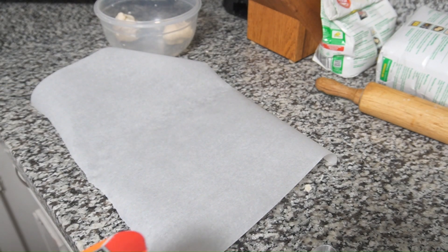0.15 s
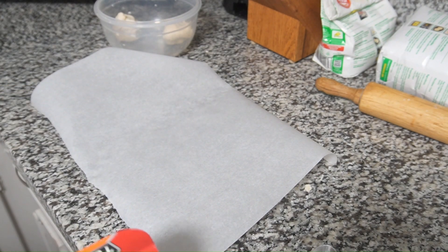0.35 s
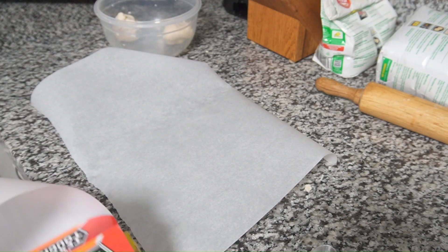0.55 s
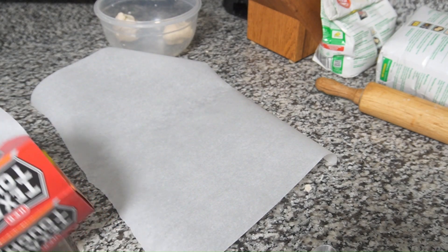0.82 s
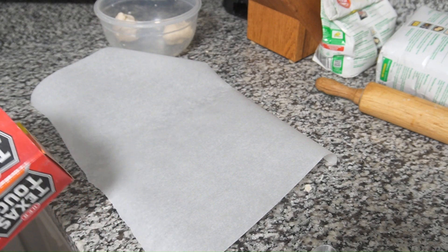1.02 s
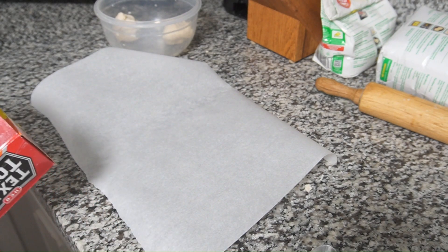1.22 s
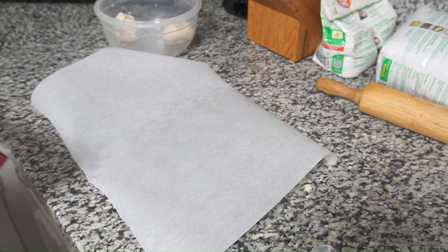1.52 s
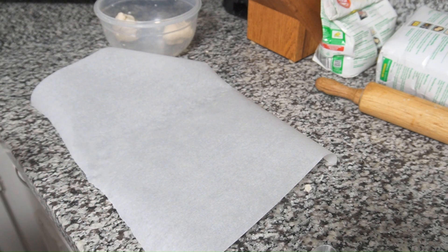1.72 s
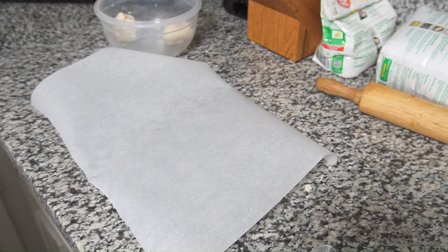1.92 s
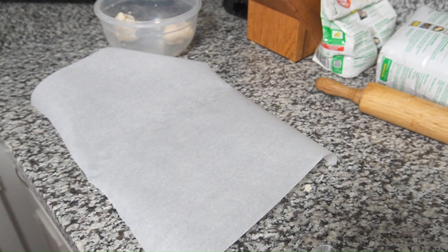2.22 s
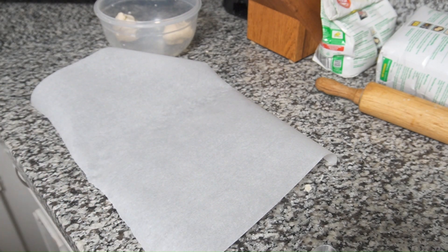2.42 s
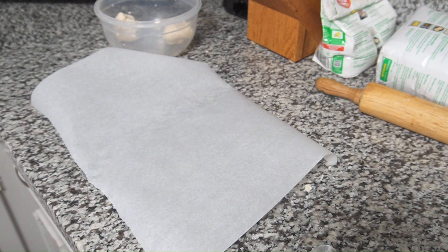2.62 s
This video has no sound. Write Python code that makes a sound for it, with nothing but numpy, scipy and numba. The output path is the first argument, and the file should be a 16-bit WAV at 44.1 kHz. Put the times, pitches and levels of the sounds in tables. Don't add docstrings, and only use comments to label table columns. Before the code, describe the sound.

Parchment paper rustles close up on a stone counter: light strokes, a long hissing drag, brisk rubbing, a second drag, then a soft box bump and last crinkles over faint kitchen hum, in stereo.

```python
import sys
import numpy as np
from scipy import signal
from scipy.fft import rfft, irfft
from scipy.io import wavfile
from scipy.ndimage import uniform_filter1d
from numba import njit

SR = 44100
rng = np.random.default_rng(int(sys.argv[2]) if len(sys.argv) > 2 else 0)


def volts(x):
    e = np.asarray(x, float) / 20
    return 10 ** e


def master(y):
    cut = np.clip(np.atleast_2d(y).T, -1, 1)
    pcm = np.round(cut * 32767)
    wavfile.write(sys.argv[1], SR, pcm.astype(np.int16))


N = 121275


@njit
def resonator(x, hz, width):
    y, b, l = np.empty(len(x)), 0., 0.
    g, k = np.tan(np.pi * hz / SR), width / hz
    for i in range(len(x)):
        v = (b + g * (x[i] - l)) / (1 + g * (g + k))
        b, l, y[i] = 2 * v - b, l + 2 * g * v, k * v
    return y


def unit(x):
    return x / np.sqrt(np.mean(x ** 2))


def band(x, hz, width):
    hz, width = float(hz), float(width)
    return unit(resonator(resonator(x, hz, width), hz, width))


def noise_band(hz, width):
    return band(rng.standard_normal(N), hz, width)


def at(table, hz):
    points = np.array(table)
    return np.interp(np.log(hz), np.log(points[:, 0]), points[:, 1])


def over_time(table, t):
    return np.interp(t, *np.array(table).T)


def walk(rate):
    k = int(SR / rate)
    steps = np.repeat(rng.standard_normal(N // k + 1), k)
    return unit(uniform_filter1d(uniform_filter1d(steps, k), k)[:N])


# frequency in Hz, side level in dB.
SIDE_LEVELS = [(60, -30), (130, -29), (220, -24), (380, -27.5), (700, -17.5), (1290, -15.5), (2380, -10),
               (4400, -8), (8120, -5), (15000, -1)]


def stereo(mid, side, hz):
    return mid + volts(at(SIDE_LEVELS, hz)) * side * np.array([[1], [-1]])


# frequency in Hz, level in dB per Hz.
KITCHEN_NOISE = [(30, -17), (90, -7.5), (150, -2.5), (250, -4), (450, -4), (700, -14), (2500, -10),
                 (16000, -40.5)]
# frequency in Hz, level in dB.
MAINS_HUM = [(59.5, -63), (119, -68)]


def kitchen(t):
    noise = 0
    for hz in 35 * 2 ** np.arange(0, 8.9, .5):
        mid, side = noise_band(hz, hz * 0.47), noise_band(hz, hz * 0.47)
        gain = volts(at(KITCHEN_NOISE, hz) + 1.8 * walk(6.3)) * np.sqrt(hz)
        noise = noise + gain * stereo(mid, 2.6 * side, hz)
    hum = 0
    for hz, db in MAINS_HUM:
        phase = 2 * np.pi * hz * t + 0.17 * walk(2.2)
        hum = hum + volts(db + 3 + 0.55 * walk(6.7)) * np.sin(phase)
    return unit(noise) * volts(-49) + hum


# loudest moment in seconds, level in dB, rise in seconds per 20 dB,
# fall in seconds per 20 dB, tilt in dB per octave.
HAND_STROKES = [(0.008, -34, 2, -0.02, -1), (.03, -43, 2, 0.1, 0), (0.077, -37, -0.1, 0.07, 0.5),
                (0.1, -33, 0.03, -0.02, 0.5), (.12, -44.5, 0.5, .6, -1.5), (0.208, -33, -0.1, 0.2, -0.5),
                (.232, -31, 0, 0, -0.5), (.262, -33, 0.03, 0.2, -0.5), (.283, -35, -0.02, 0.2, 0),
                (.305, -32.5, -0.06, 1.05, -2.5), (.735, -27.5, 0.07, 0.05, -1),
                (0.767, -22.5, .08, 0.03, 1.5), (0.789, -26, .03, 0.05, 1.5), (0.865, -24, 0.1, 0.08, -1),
                (.885, -27.5, 0.11, -0.03, -1), (.905, -21.5, 0.04, 0.05, 0),
                (.928, -25.5, 0.1, -0.03, -1.5), (.975, -24, 0.13, 0.04, -1), (1.005, -24.5, 0.07, 0.03, 0),
                (1.033, -23, 0.1, 0.04, 0.5), (1.058, -29, 0.16, -0.04, -0.5),
                (1.086, -32, 0.26, .06, -0.5), (1.155, -27, 0.04, 0.07, -.5), (1.186, -25, 0.08, 0.08, 0),
                (1.211, -32.5, 0, 0.08, -2), (1.25, -39.5, -0.6, 0.6, -1), (1.319, -32.5, -0.1, 0.3, -0.5),
                (1.345, -26.5, -0.02, 0.1, 0.5), (1.368, -25, 0.03, 0.08, 1),
                (1.424, -28.5, 0.02, 0.11, -1.5), (1.46, -28.5, 0.08, 0.07, -1), (1.51, -37, 0, 0.14, 0.5),
                (1.588, -33.5, 0, 0.17, 0), (2.245, -31, 0.1, 0.13, 0), (2.294, -22, 0.04, 0.1148, 0.5),
                (2.35, -30, 0.14, 0.1, -0.5), (2.415, -27.5, 0.07, 0.12, 0.5), (2.49, -38.5, 0.2, 0.17, 0),
                (2.595, -43.5, 0, 0, -.5), (2.74, -49, -0.4, .3, 0)]
# time in seconds, level in dB, tilt in dB per octave, box drone in dB.
LONG_SLIDES = [
    [(0.3, -51, -8, -24), (0.326, -26.5, 2.0, -18), (0.338, -30.5, 2.0, -13.5), (0.406, -24, 1.5, -13.5),
     (0.428, -24.5, 2, -17), (0.652, -23.5, 1, -23.5), (0.705, -30.5, -1.5, -25)],
    [(1.62, -43, -0.5, -26), (1.666, -27.5, -1, -17), (1.714, -22, 1, -25), (1.998, -23.5, 2.0, -24),
     (2.08, -22, 0.5, -22.5), (2.15, -26, 0, -27), (2.2, -32, 0, -35), (2.24, -44, -3, -5)],
]


def motion(t, octaves):
    lean = octaves * (2.38 if octaves > 0 else .6)
    power = 0
    for s, db, rise, fall, tilt in HAND_STROKES:
        slopes = np.where(t < s, (s - t) / max(rise, .005), (t - s) / max(fall, .005))
        power = power + volts(db + tilt * lean - 20 * slopes) ** 2
    for slide in LONG_SLIDES:
        s, db, tilt, _ = np.array(slide).T
        power = power + volts(np.interp(t, s, db + tilt * lean, -120, -120)) ** 2
    soft_s = .009
    return uniform_filter1d(power, size=int(soft_s * 1000) + 1)


def crackle():
    return unit((rng.random(N) < 260 / SR) * rng.standard_normal(N))


def grit():
    hit_db = 3 * np.minimum(rng.exponential(size=N), 2.8)
    hits = (rng.random(N) < 2200 / SR) * volts(hit_db)
    return unit(1 + volts(-9) * unit(signal.lfilter([1], [1, -np.exp(-1 / (.0003 * SR))], hits)))


def slice_of(spectrum, hz, octaves):
    bins_hz = np.arange(1, len(spectrum) + 1) * SR / 2 / len(spectrum)
    off = np.log2(bins_hz / hz) / octaves
    return irfft(spectrum * np.cos(np.pi / 2 * np.clip(off, -1, 1)), 2 * len(spectrum) - 2)[:N]


# frequency in Hz, level in dB per Hz.
PAPER_TONE = [(200, -19.5), (500, -11.5), (800, -10.5), (1150, -1.5), (2200, 1), (4800, -1.5),
              (9000, -10.5), (16000, -19)]
# time in seconds, boost in dB.
CURL_HOLLOW = [(0, 0.3), (.42, 3.5), (.5, 1), (.9, -3), (1.1, 4), (1.5, 5), (1.75, -0.9), (1.95, 3.2),
               (2.04, -3.5), (2.1, 0), (2.4, -4), (2.7, 3.5)]


def rubbing(t):
    def rub_spectrum(grains):
        hiss = grains * rng.standard_normal(N)
        return rfft(unit(hiss + volts(-6) * crackle()), 2 ** 17)

    grains = [grit() for _ in range(8)]
    noise = [[rub_spectrum(g) for g in grains[k:k + 2]] for k in range(0, 8, 2)]
    out, slow, swell = 0, t[::44], walk(24.76)
    hollow_db, step = over_time(CURL_HOLLOW, t), 1 / 7
    for k, hz in enumerate(200 * 2 ** np.arange(0, 6.4, step)):
        octaves = max(np.log2(hz / 3190), -1.5)
        power = np.interp(t, slow, motion(slow, octaves))
        hollow = hollow_db * np.exp(-(np.log2(hz / 1350) / .45) ** 2)
        patch = min(.75, 5000 / hz) * walk(18)
        gain = np.sqrt(power) * volts(at(PAPER_TONE, hz) + 5.5 + hollow + .3 * swell + patch)
        mid, side = (slice_of(x, hz, step) for x in noise[k % 4])
        out = out + gain * stereo(mid, side, hz)
    return out


def counter(x):
    hop, out = int(.15 * SR), 1. * x
    for i in range(-hop, N, hop):
        start = max(i, 0)
        decay = volts(-60 * np.arange(6000) / SR / .13)
        echo = resonator(rng.standard_normal(6000), 2140.0, 12000.0) * decay
        echo = echo / np.sqrt(np.sum(echo ** 2))
        fade = np.cos(np.pi / 2 * np.clip((np.arange(N) - i - hop) / hop, -1, 1)) ** 2
        part = (x * fade)[:, start:i + 2 * hop]
        wet = signal.fftconvolve(part, echo[None], axes=1)[:, :N - start]
        out[:, start:start + wet.shape[1]] += volts(-9) * wet
    return out


# start in seconds, peak in dB, pitch in Hz,
# time to fade by 60 dB in seconds, spray in dB.
CREASES = [(.006, -23, 3200, 0.025, -18.5), (0.0734, -28.5, 3160, 0.048, -12),
           (0.185, -26, 2860, 0.035, -22), (.2059, -26, 2500, 0.033, -13),
           (0.2233, -15.5, 3140, 0.033, -15), (0.2284, -16.5, 2550, 0.051, -11.5),
           (0.2588, -23, 2400, 0.034, -22), (0.3164, -16, 2180, 0.038, -25),
           (0.3256, -19, 1600, 0.047, -0.5), (0.42, -12, 1300, 0.058, -12), (0.7244, -23.5, 1760, 0.1, -23),
           (.765, -15.5, 4500, 0.044, -2), (0.7873, -20.5, 4680, 0.046, 1), (0.8587, -21, 5220, 0.052, -10),
           (0.9015, -12.5, 4560, 0.12, -14), (0.999, -17, 3000, 0.046, -13), (1.1078, -22, 2600, 0.029, -1),
           (1.1500, -31, 1570, 0.067, -8), (1.3145, -33, 1600, 0.06, -14), (1.3342, -23, 3530, 0.083, -13),
           (1.426, -19.5, 1620, 0.031, -13), (1.477, -17.5, 3940, 0.067, -1),
           (1.568, -25.5, 1890, 0.1, -10.5), (1.643, -25, 1520, 0.07, -8), (1.6818, -21, 3340, 0.053, -7),
           (1.701, -15.5, 1580, 0.095, -17), (1.752, -15, 2220, .05, -1), (2.012, -12, 2200, 0.037, -10),
           (2.09, -16, 1390, 0.044, -13), (2.2397, -20.5, 3470, 0.067, -6.5), (2.2882, -16, 4900, .05, -6),
           (2.3180, -15.5, 4470, 0.063, -3.5), (2.401, -17, 4470, 0.066, -15),
           (2.48, -27, 4690, 0.052, -11), (2.5504, -28, 5120, 0.035, -13)]


def snaps(t):
    spray = stereo(noise_band(9300, 12000), noise_band(9300, 12000), 6000)
    out, n = np.zeros((2, N)), 6000
    click = volts(17) * (t[:n] == 0)
    for s, db, hz, t60, spray_db in CREASES:
        i = int(s * SR)
        mid, side = (band(x, hz, hz * 0.91) for x in rng.standard_normal((2, n)) + click)
        ring = volts(-2) * stereo(mid, side, hz)
        decay = volts(-60 * t[:n] / max(t60, .005))
        out[:, i:i + n] += volts(db - 8) * decay * (ring + volts(spray_db) * spray[:, i:i + n])
    return out


def swells(t, rows):
    out = 0
    for s, db, hz, length in rows:
        shape = np.exp(-((t - s) / max(length, .01) * 2) ** 2)
        out = out + volts(db) * shape * noise_band(hz, min(hz / 4, 240))
    return out


# loudest moment in seconds, level in dB, pitch in Hz, length in seconds.
EDGE_SQUEAKS = [(.01, -38, 3350, 0.025), (0.265, -36.5, 2390, 0.048), (0.454, -31, 3700, .03),
                (0.64, -35, 2620, 0.026), (1.376, -34.5, 1310, 0.082), (1.457, -35, 1440, 0.03),
                (1.753, -28, 3900, 0.023), (1.791, -28.5, 2880, 0.057), (1.83, -35, 2550, 0.017),
                (2.056, -33, 4130, 0.048)]


def squeaks(t):
    return swells(t, EDGE_SQUEAKS)


# loudest moment in seconds, level in dB, pitch in Hz, length in seconds.
WALL_THRUMS = [(0.273, -53, 284, 0.077), (0.387, -43.5, 305, 0.092), (0.537, -47, 283, .08),
               (0.763, -48.5, 350, 0.076), (0.968, -50, 330, .05), (1.593, -54, 490, 0.056),
               (1.74, -41, 338, .04), (1.867, -42.5, 450, 0.055), (2.077, -42, 307, 0.093),
               (2.292, -44, 850, .03), (2.403, -51, 385, 0.11)]


def thrums(t):
    return swells(t, WALL_THRUMS)


# frequency in Hz, width in Hz, level in dB.
BOX_DRONE = [(340, 176, 3), (515, 250, 2.5), (196, 630, -5)]


def drone(t):
    levels = []
    for slide in LONG_SLIDES:
        s, db, _, drone_db = np.array(slide).T
        levels.append(np.interp(t, s, db + drone_db, -120, -120))
    body = unit(sum(volts(db + 0.3 * walk(11.0)) * noise_band(hz, width) for hz, width, db in BOX_DRONE))
    loudness = uniform_filter1d(volts(np.max(levels, axis=0)), size=400)
    return stereo(body, noise_band(660, 400), 440) * loudness


# start in seconds, level in dB.
BOX_KNOCKS = [
    (2.287, -25.5),
]
# frequency in Hz, level in dB, time to fade by 60 dB in seconds.
BOX_TONES = [(503, 0, .1), (310, -10, .09), (836, -3, .06), (1910, -5, .05), (2870, -8, .05),
             (640, -9, .04)]


def knock(t):
    out = 0
    for s, db in BOX_KNOCKS:
        since = t - s
        attack = np.clip(since / 0.0035, 0, 1)
        for hz, tone_db, t60 in BOX_TONES:
            decay = volts(db + tone_db - 60 * np.clip(since, 0, 9) / t60)
            out = out + decay * attack * np.sin(2 * np.pi * hz * since)
    return out


def room_tail(sharp, t):
    tail = rng.standard_normal((2, 15000)) * volts(-60 * t[:15000] / .25)
    tail = tail / np.sqrt(np.sum(tail ** 2) / 2)
    return volts(-9) * signal.fftconvolve(sharp, tail, axes=1)[:, :N]


def ducking(paper):
    loud_db = 10 * np.log10(uniform_filter1d(paper[0] ** 2, size=int(.2 * SR)) + 1e-9)
    return volts(-.45 * np.clip(loud_db + 29, 0, 30))


# time in seconds, left over right in dB.
PAPER_LEFT = [(0, -0.7), (.4, 0.8), (.9, 1.2), (1.5, 1), (2.0, .8), (2.7, 0.2)]


def scene():
    t = np.arange(N) / SR
    sharp = snaps(t) + knock(t)
    paper = counter(rubbing(t)) + squeaks(t) + thrums(t) + drone(t) + sharp + room_tail(sharp, t)
    left_db = over_time(PAPER_LEFT, t)
    return paper * volts(np.array([left_db, -left_db]) / 2) + ducking(paper) * kitchen(t)


def band_limit(x):
    return signal.sosfilt(signal.butter(12, 15950, fs=SR, output="sos"), x)


def record(dry):
    bins_hz = np.arange(2 ** 16 + 1) * SR / 2 ** 17
    cut = irfft(rfft(dry, 2 ** 17) * (bins_hz < 15950))[:, :N]
    return band_limit(cut)


dry = scene()
out = record(dry)
master(out)
```